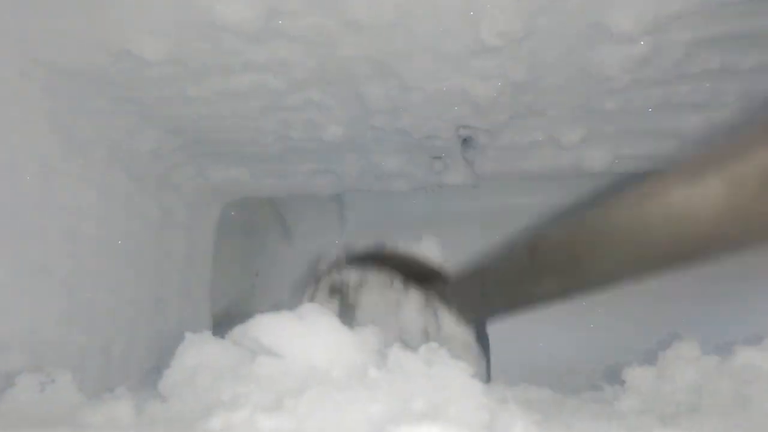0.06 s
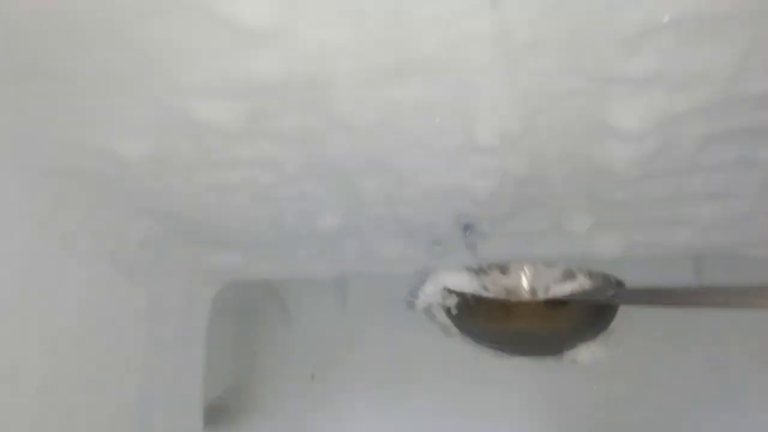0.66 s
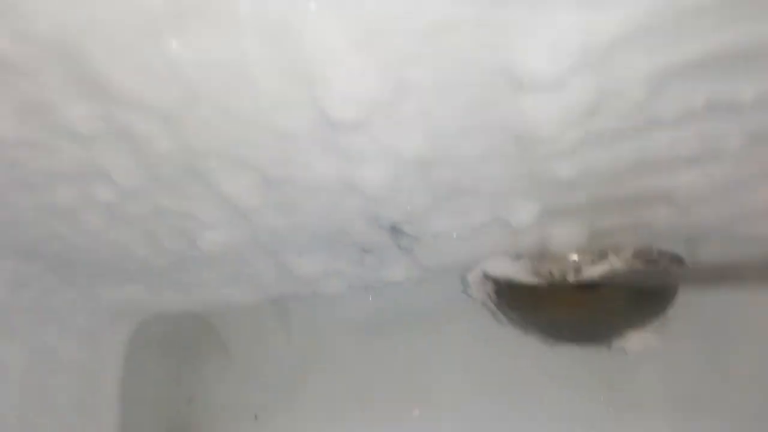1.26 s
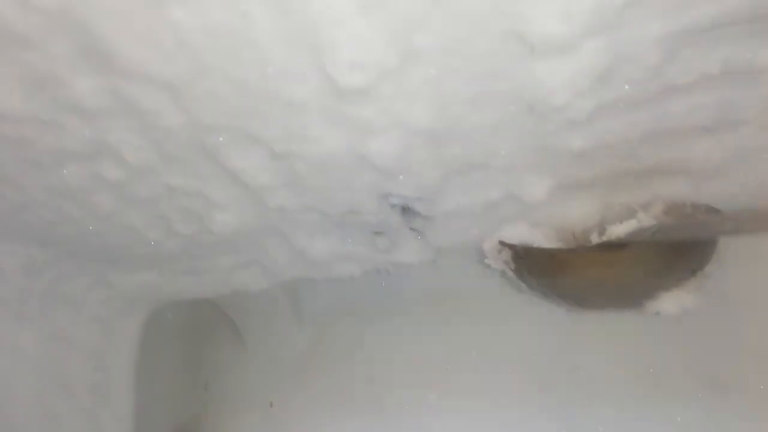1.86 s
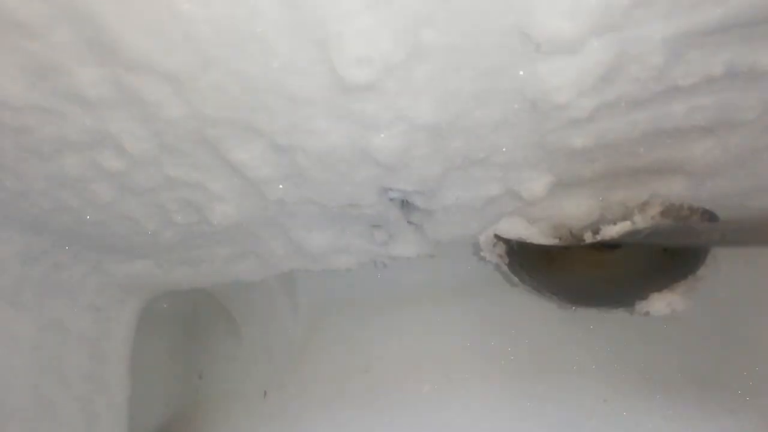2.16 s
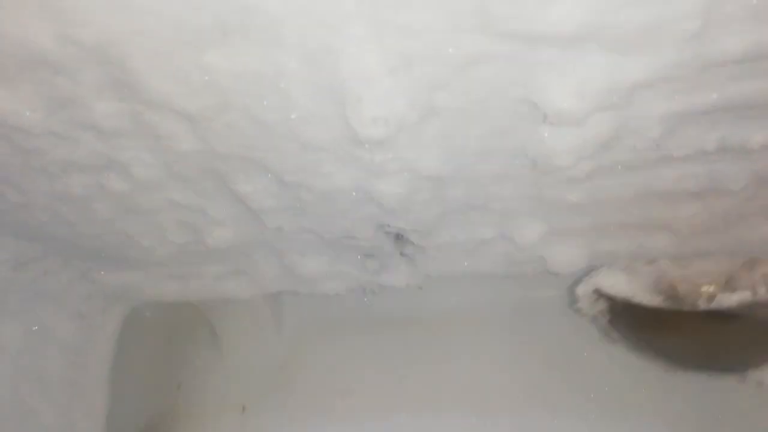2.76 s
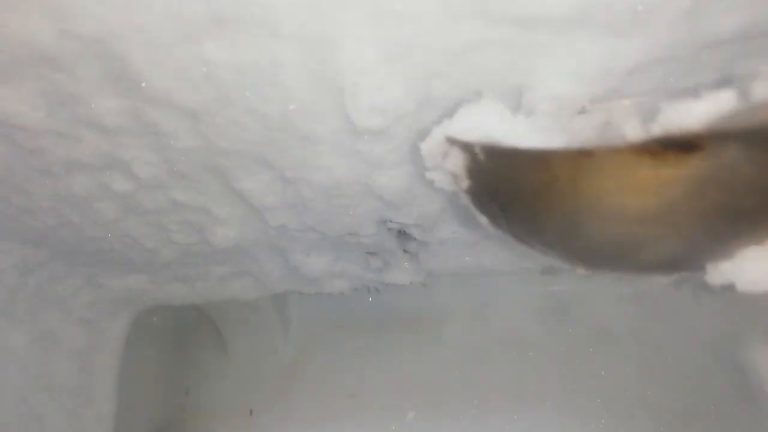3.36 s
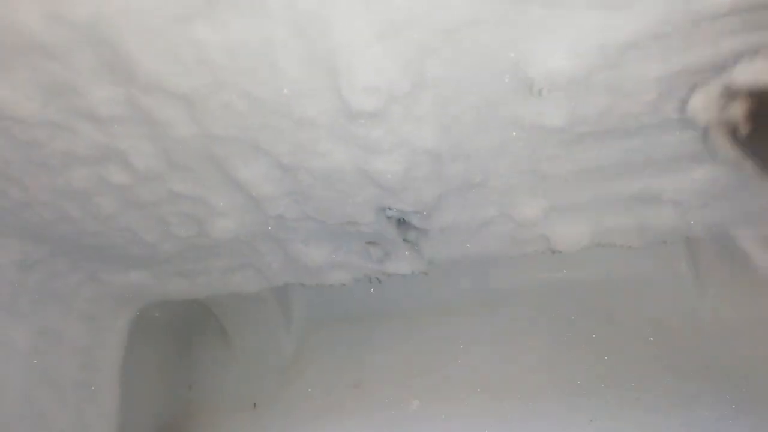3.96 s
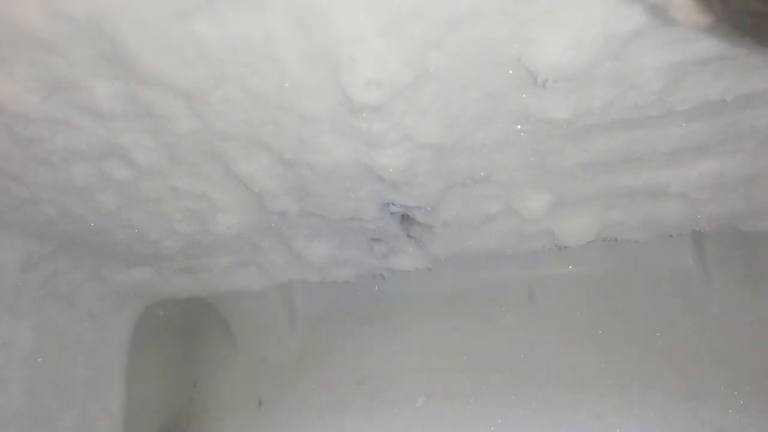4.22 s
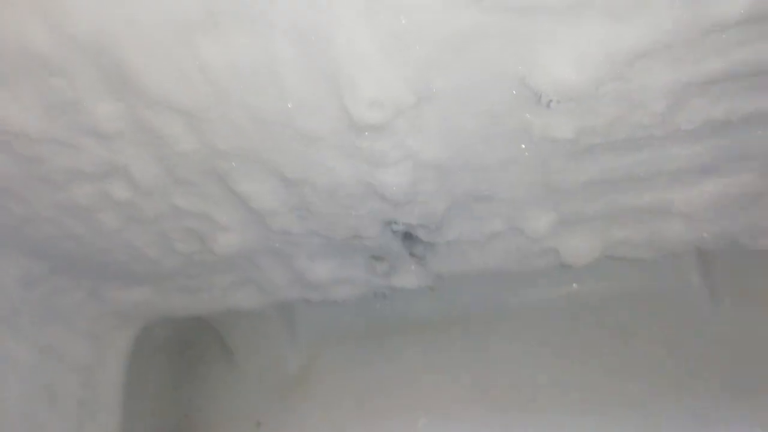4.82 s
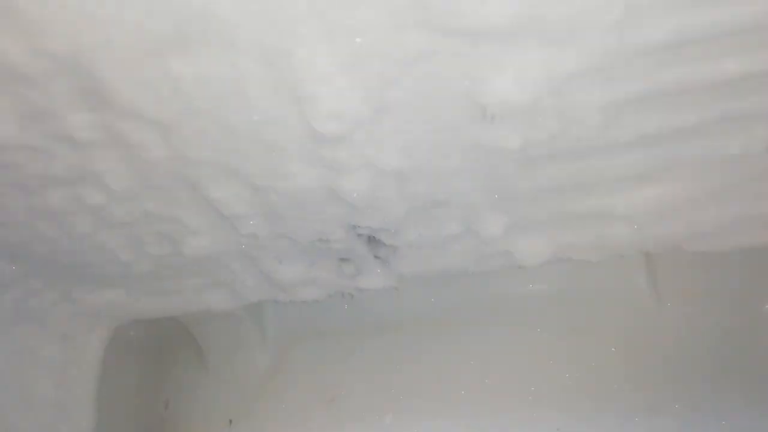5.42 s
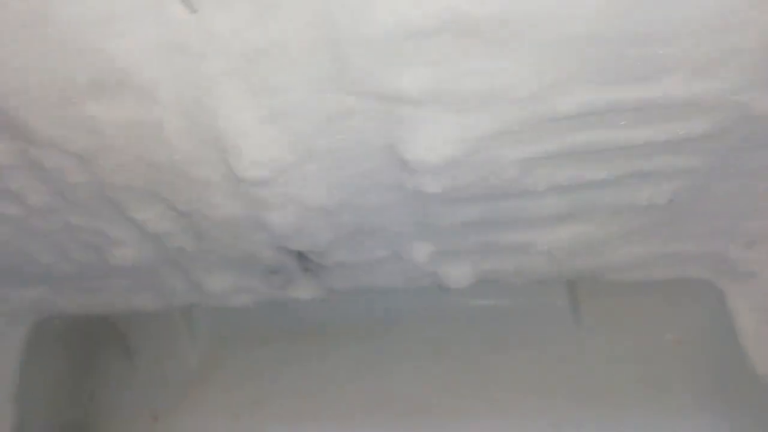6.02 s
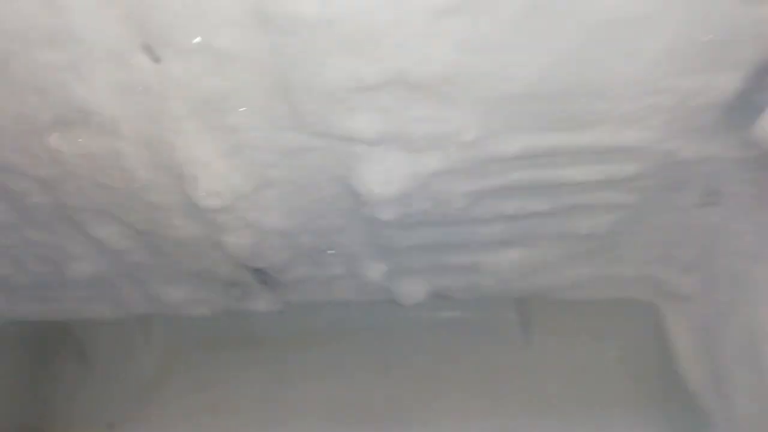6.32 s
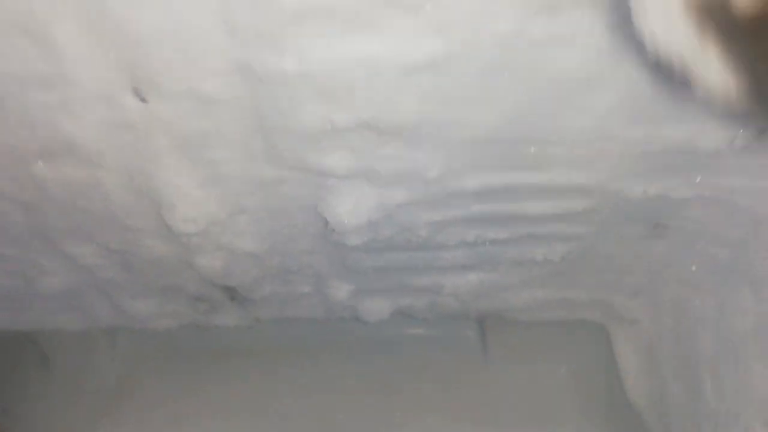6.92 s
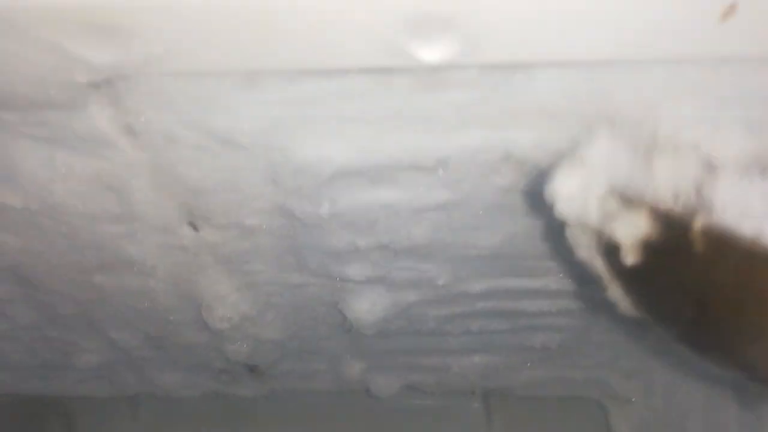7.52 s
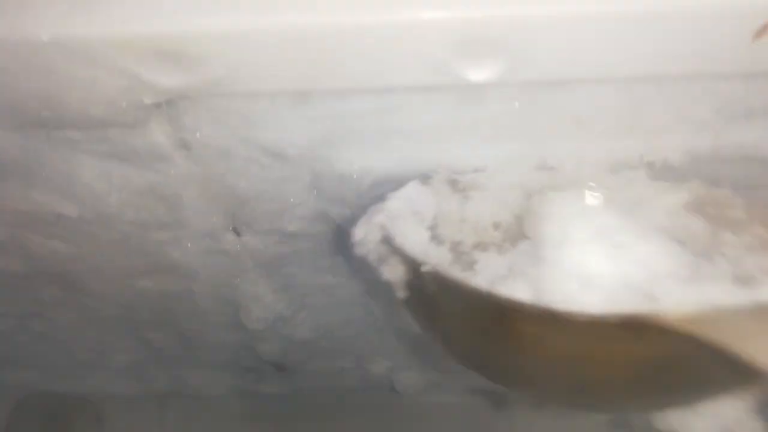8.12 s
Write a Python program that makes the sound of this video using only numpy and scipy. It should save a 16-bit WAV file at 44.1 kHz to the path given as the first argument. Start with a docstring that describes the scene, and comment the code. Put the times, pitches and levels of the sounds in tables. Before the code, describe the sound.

A metal spoon works at thick frost in a freezer, heard close up from the opening. It starts with two hollow, crunchy knocks and a brief scrape, then a crumb of ice clicks sharply against the microphone. A run of crunching strokes follows, the spoon sticking and slipping as ice snaps and the boxy wall thumps. Soft low handling rumbles and a faint hiss lie underneath.

```python
"""Inside a small freezer compartment, heard from a pair of microphones at its mouth, the left
facing the work. A metal spoon scrapes packed frost off the roof, push after push. It knocks the hollow
wall into ringing, then sticks and slips, crushing a stream of ice crystals; now and then a chunk cracks
off. Behind it lie a low noise floor and faint wisps of hiss. The wall's fading ring rumbles at the
start; later a hand shifts on the microphone housing, and a crumb of ice hits it."""
import sys
import numpy as np
from scipy import signal
from scipy.fft import rfft, irfft, next_fast_len
from scipy.io import wavfile

SR = 44100
rng = np.random.default_rng(int(sys.argv[2]) if len(sys.argv) > 2 else 0)


def pcm_store(signal):
    """Save signal as 16-bit PCM."""
    levels = np.round(np.clip(np.atleast_2d(signal), -1, 1) * 32767)
    wavfile.write(sys.argv[1], SR, levels.astype(np.int16).T)


N = 360724
TIME = np.arange(N) / SR


def from_db(db):
    """Decibels to gain."""
    return 10 ** (np.asarray(db) / 20)


def unit_rms(x):
    """Scale to an rms of 1."""
    return x / np.sqrt(np.mean(x ** 2) + 1e-20)


def butter(x, order, hz, kind="low"):
    """Causal Butterworth filter."""
    return signal.sosfilt(signal.butter(order, hz, kind, fs=SR, output="sos"), x)


def drift(per_s):
    """Glide between random values of spread 1."""
    knots = rng.standard_normal(int(N / SR * per_s) + 2)
    return np.interp(TIME * per_s, np.arange(len(knots)), knots)


def swells(rows):
    """Gain of bell-shaped swells."""
    return sum(from_db(db) * np.exp(-((TIME - s) / half_s) ** 2) for s, db, half_s in rows)


def colour(x, spectrum, peaks=(), size=4096):
    """Causal filter of unit power with a smooth spectrum and resonant peaks."""
    hz = np.maximum(np.arange(size // 2 + 1) * SR / size, 1)
    knot_hz, knot_db = np.transpose(spectrum)
    level_db = np.interp(np.log(hz), np.log(knot_hz), knot_db)
    level_db += sum(lift / (1 + (2 * (hz - f) / width) ** 2) for f, width, lift in peaks)
    cepstrum = irfft(np.log(from_db(level_db)))
    cepstrum[1:size // 2] *= 2   # fold to minimum phase
    cepstrum[size // 2 + 1:] = 0
    response = irfft(np.exp(rfft(cepstrum)))
    return signal.oaconvolve(x, response / np.linalg.norm(response))[:N]


def wander(x, depth_db, per_s):
    """Each region of the spectrum grows louder and softer on its own."""
    out, rest = 0, x
    for edge_hz in [500, 900, 1500, 2300, 3500, 5500, 9000]:
        low = signal.sosfiltfilt(signal.butter(2, edge_hz, fs=SR, output="sos"), rest)
        out = out + low * from_db(depth_db * drift(per_s))
        rest = rest - low
    return out + rest


def fractures(per_s, spread_db):
    """Crystals snap at random moments, many small and a few large; rms 1."""
    sizes = from_db(spread_db * np.minimum(rng.exponential(1, N), 5)) * rng.choice([-1, 1], N)
    return unit_rms(sizes * (rng.random(N) < per_s / SR))


def ring(force, hz, t60):
    """One mode: each click sets off a decaying sine."""
    r, w = from_db(-60 / (t60 * SR)), 2 * np.pi * hz / SR
    return signal.lfilter([0, np.sin(w)], [1, -2 * r * np.cos(w), r * r], force + 1e-18)


def strike(times_s, heights, modes):
    """Blows ring the modes, with one height for each blow and mode."""
    out = np.zeros(N)
    for (hz, _, t60), height in zip(modes, heights.T):
        blows = np.zeros(N)
        blows[(times_s * SR).astype(int)] = height
        out += ring(blows, hz, t60)
    return out


def mode_shares(modes, spot_hz, reach_octaves):
    """Each spot of the wall favours the modes near its own pitch; unit power."""
    hz, mode_db, _ = np.transpose(modes)
    share = from_db(mode_db) / (1 + (np.log2(hz / spot_hz[:, None]) / reach_octaves) ** 4)
    return share / np.linalg.norm(share, axis=1, keepdims=True)


# The quiet at the mouth of the box. Each row: frequency in Hz, relative level in dB.
FLOOR_SPECTRUM = [(15, -49), (25, 3.5), (141, -0.5), (734, -24), (796, -20.5), (1440, -25.5), (2160, -21),
                  (2690, -28.5), (4740, -24), (16000, -34.5)]

def noise_floor(level_db=-52.5, sway_db=1.73):
    """A faint floor wavers in patches, alike at both microphones in the bass, duller on the right."""
    common, side = [colour(rng.standard_normal(N), FLOOR_SPECTRUM) for _ in range(2)]
    side = butter(side, 2, 450, "high") * [[1], [-1]]
    gain = from_db(level_db + sway_db * drift(7))
    left, right = gain * (wander(common, depth_db=5, per_s=18) + side)
    return np.array([left, butter(right, 1, 5500)])


# Faint hiss behind the spoon, perhaps from the cooling pipes.
# Each row: start in seconds, centre in Hz, level in dB.
HISS_WISPS = [(.17, 5300, -48), (0.709, 3950, -44), (.71, 7850, -47.5), (0.926, 4960, -46.5),
              (1.015, 4150, -39.5), (1.171, 7100, -50.5), (2.299, 3400, -44.5), (2.466, 2260, -50.5),
              (2.669, 6300, -42), (2.763, 4230, -38.5), (4.391, 4170, -45.5), (4.609, 6400, -50.5),
              (5.535, 6230, -51), (6.256, 2300, -38), (6.96, 5450, -50), (7.06, 4760, -48.5),
              (7.65, 4300, -50.5), (7.809, 2140, -47)]

def wisps(stray_count=24, stray_db=-51, rise_s=.019, band_ratio=1.13):
    """Narrow hiss swells quickly and fades; fainter wisps stray in at random."""
    strays = [(when * (TIME[-1] - .25), 3000 * 4 ** pitch, stray_db)
              for when, pitch in rng.random((stray_count, 2))]
    out = np.zeros(N)
    for s, hz, level_db in list(HISS_WISPS) + strays:
        span = slice(int(s * SR), int(s * SR) + 9000)
        age = np.maximum(TIME[span] - s, 0) / rise_s
        hiss = butter(rng.standard_normal(len(age)), 1, [hz / band_ratio, hz * band_ratio], "band")
        out[span] += from_db(level_db) * unit_rms(hiss) * age * np.exp(1 - age)
    return out


# Low rumbles: the wall's fading ring at the start, then a hand shifting on the housing.
# Each row: middle in seconds, level in dB, half length in seconds.
LOW_RUMBLES = [(0.0, -33, 0.062), (0.377, -32, 0.13), (1.657, -45.5, 0.15), (4.0, -46, 0.36),
               (5.22, -39.5, 0.37), (5.55, -35, 0.038), (5.655, -40.5, 0.023), (6.478, -38, 0.0072),
               (6.81, -36.5, 0.23), (7.188, -39, 0.017), (7.59, -39, 0.063)]

def low_rumbles():
    """Deep noise swells and fades, alike at both microphones."""
    spectrum = [(15, -20), (45, -1.5), (90, -3.5), (140, -6.5), (300, -19.5), (1000, -73)]
    return colour(rng.standard_normal(N), spectrum) * swells(LOW_RUMBLES)


# Ice landing on the housing, nearest the right microphone.
# Each row: time in seconds, relative peak in dB, half width in milliseconds.
CRUMB_TAPS = [(2.3759, -18, 0.36), (2.3804, 2.5, 0.098)]

def ice_crumb(left_db=-12, left_lag_s=.0008):
    """Each tap is a sharp pressure pulse on the right, later and blunter on the left."""
    out = np.zeros((2, N))
    for s, peak_db, half_ms in CRUMB_TAPS:
        half_s = half_ms / 1000
        out[0] -= from_db(peak_db + left_db) * np.exp(-.5 * ((TIME - s - left_lag_s) / (2 * half_s)) ** 2)
        out[1] -= from_db(peak_db) * np.exp(-.5 * ((TIME - s) / half_s) ** 2)
    return butter(out + 1e-18, 1, 170, "high")


# The right microphone against the left; the pair straddles the node of the box's sideways mode.
# Each row: frequency in Hz, level in dB, phase lag in radians.
RIGHT_RESPONSE = [(20, -1.5, 0.5), (231, 1.5, 0.29), (306, -5, 0.5), (348.3, -0.5, 4), (877, -3, 4),
                  (1210, 1.5, 5.5), (1270, -1.5, 4.5), (1650, -8.5, 9), (1830, -4, 8.5), (2400, -10.5, 9.5),
                  (4130, -8.5, 16.5), (7120, -13.5, 27.5), (9740, -16, 36.5), (16500, -31, 97)]

def compartment(x, t60=.024, moves_per_s=16, spots=6):
    """Rough icy walls scatter the treble into a short tail; its pattern shifts as the spoon travels."""
    age = TIME[:6000]
    tails = rng.standard_normal((spots, 2, len(age))) * from_db(-60 * age / t60) * (age > .001)
    tails /= np.linalg.norm(tails, axis=2, keepdims=True)
    tails = butter(tails, 2, 1100, "high")
    weights = np.array([drift(moves_per_s) for _ in range(spots)])
    weights /= np.linalg.norm(weights, axis=0)
    scattered = sum(signal.oaconvolve((x * weight)[None], tail, axes=1)[:, :N]
                    for weight, tail in zip(weights, tails))
    direct = colour(x, [(20, -16), (800, 8), (2500, -4), (16000, -4)])
    left, right = from_db(-3.5) * direct + from_db(-3) * scattered
    size = next_fast_len(N + 16384)
    bins_hz = np.arange(size // 2 + 1) * SR / size
    hz, level_db, lag = np.transpose(RIGHT_RESPONSE)
    shade = from_db(np.interp(bins_hz, hz, level_db)) * np.exp(-1j * np.interp(bins_hz, hz, lag))
    return np.array([left, irfft(rfft(right, size) * shade, size)[:N]])


# Resonances of the box and the frost-laden spoon, heard from the mouth.
# Each row: centre in Hz, width in Hz, lift in dB.
RESONANCES = [(361.6, 67, 10.5), (512, 29, 15.5), (612, 73, 13.5), (806, 13, 10), (875, 60, 2),
              (1070, 82, 5), (1260, 57, 0.5), (1336, 49, 10.5), (1626, 41, 11), (1710, 110, 6.5),
              (2154, 810, 8), (2270, 310, 0), (2784, 220, 4.5), (3710, 40, 2), (5400, 720, 8),
              (6000, 71, 0.5), (7990, 200, -4), (10540, 550, 8), (12800, 180, 7.5)]
# Light rubs inside the box. Each row: middle in seconds, relative level in dB, half length in seconds.
SPOON_RUBS = [(1.655, -45.5, 0.094), (2.02, -50.5, 0.15), (2.29, -42.5, 0.08), (2.392, -35.5, 0.0076)]

def resting_spoon():
    """Between the first strokes the spoon trembles against the frost."""
    spectrum = [(200, -8), (1200, 2), (4500, 6.5), (9000, -6), (16000, -7)]
    rub = colour(fractures(per_s=6400, spread_db=5.5), spectrum, RESONANCES)
    return rub * swells(SPOON_RUBS) * from_db(3.7 * drift(30.67))


# The frosted wall, just beyond the microphones. Each row: mode in Hz, weight in dB, t60 in seconds.
WALL_MODES = [(99.7, -1, 0.9), (133, 12, 0.14), (150.1, -0.5, 0.35), (161.5, -20, 0.14),
              (196.6, -0.5, 0.23), (227.2, -2.5, 0.17), (260.8, 5.5, 0.14), (288, -22.5, 0.26),
              (378, -8, 0.074)]
# The spoon crushes a crust and, at the height of the crunch, meets the wall.
# Each row: time in seconds, thump in dB, pitch of that spot in Hz, clack in dB, crunch in dB,
# crunch treble in dB, crushing time in seconds. Levels are relative.
WALL_KNOCKS = [(.078, -4, 157, -10, -23, -34.5, .0012), (0.272, -2, 140, -9.5, -20.5, -39.5, 0.0019),
               (.37, -23, 92.5, -30, -62, -67, 0.0031), (.398, -17.5, 191, -43, -70, -65, 0.0063),
               (1.056, -20, 323, -26, -19, -43, 0.0073), (1.296, -22.5, 320, -52, -31.5, -45, 0.017),
               (1.443, -22.5, 280, -35, -31, -49, 0.024), (2.623, -23, 251, -44, -25.5, -41, 0.01),
               (2.902, -10, 294, -27, -13.5, -41, 0.0016), (3.214, -8, 277, -28, -22, -34, 0.0025),
               (3.857, -15, 273, -36, -46, -54, 0.0055), (3.911, -17.5, 262, -39, -21.5, -48, 0.015),
               (3.955, -19.5, 210, -41, -32, -21.5, 0.00078), (4.025, -13.5, 238, -26, -14, -30, 0.0021),
               (4.116, -10.5, 225, -6.5, -16, -31, 0.0012), (4.191, -13.5, 210, -17.5, -29, -33, 0.002),
               (4.688, -24.5, 173, -48, -27.5, -41.5, 0.0031), (4.744, -24, 244, -22, -37, -67, 0.018),
               (4.913, -15, 165, -16, -24, -22, 0.0028), (5.108, -13, 228, -25, -21.5, -26, 0.0012),
               (5.226, -12, 172, -14.5, -20.5, -37, 0.0034), (5.759, -12, 178, -26.5, -24, -40, 0.0026),
               (5.982, -16, 180, -32, -17, -28.5, 0.002), (6.05, -15.5, 132, -32, -24, -47, 0.018),
               (6.562, -9.5, 132, -27.5, -26.5, -34.5, 0.0029), (6.682, -22, 98, -52, -49, -57, 0.0034),
               (7.248, -12, 155, -17.5, -22.5, -45, 0.0034), (7.894, -7, 175, -33, -19, -35.5, 0.0026)]

def wall_thumps(contact_s=.0016):
    """Each knock rings the low modes that are lively at the struck spot."""
    times_s, thump_db, spot_hz, *_ = np.transpose(WALL_KNOCKS)
    heights = from_db(thump_db)[:, None] * mode_shares(WALL_MODES, spot_hz, reach_octaves=.59)
    cushion = np.hanning(int(contact_s * SR) + 3)   # frost softens the contact
    thumps = np.convolve(strike(times_s, heights, WALL_MODES), cushion / cushion.sum())[:N]
    return from_db(.5) * butter(thumps, 2, 95, "high")


# Higher modes of the same wall. Each row: frequency in Hz, weight in dB, t60 in seconds.
CLACK_MODES = [(357, -22.5, 0.197), (548, -17.5, 0.079), (756, 2, 0.017), (845, 3, 0.03), (990, 2, 0.039),
               (1200, 9, 0.025), (1204, 12, 0.018), (1407, 16.5, 0.012)]

def wall_clacks(pitch_ratio=3.1, linger_t60=.17):
    """Hard knocks reach the higher modes: a hollow clack that lingers in the box."""
    times_s, _, spot_hz, clack_db, *_ = np.transpose(WALL_KNOCKS)
    heights = from_db(clack_db[:, None] + rng.normal(0, 3.9, (len(times_s), len(CLACK_MODES))))
    heights *= mode_shares(CLACK_MODES, pitch_ratio * spot_hz, reach_octaves=.43)
    lingering = strike(times_s, heights, [(hz, db, linger_t60) for hz, db, _ in CLACK_MODES])
    return from_db(-5.5) * strike(times_s, heights, CLACK_MODES) + from_db(-23) * lingering


def wall_shudder():
    """The dragging spoon keeps the wall trembling on its way from one knocked spot to the next."""
    times_s, _, spot_hz, *_ = np.transpose(WALL_KNOCKS)
    drag = fractures(per_s=500, spread_db=3) * push_gain("tremble")
    shares = mode_shares(WALL_MODES, spot_hz, reach_octaves=.87).T
    trembling = sum((-1) ** k * ring(drag * np.interp(TIME, times_s, shares[k]), hz, t60)
                    for k, (hz, _, t60) in enumerate(WALL_MODES))
    return np.std(drag) * unit_rms(trembling)


# Coarse grains and fine crystals, crushed close by. Each row: frequency in Hz, relative level in dB.
GRAIN_SPECTRUM = [(100, 7.5), (300, 2.5), (500, -6), (900, -.5), (1500, -1), (2700, 2), (4000, -1),
                  (8000, -12), (16000, -101)]
CRYSTAL_SPECTRUM = [(300, 15.5), (2000, -12.5), (3700, 25), (5000, 18.5), (8000, 12.5), (13000, 13.5),
                    (14300, 9), (16000, 7)]
# Chunks leaving the roof without a knock. Each row: peak time in seconds, relative crunch and
# treble levels in dB, crushing time in seconds.
CHUNK_CRACKS = [(1.681, -33.5, -76, 0.0029), (2.235, -23, -53, 0.0017), (3.738, -28.5, -38.5, 0.0059),
                (3.787, -29, -51, 0.011), (3.811, -44, -30, 0.0024), (4.177, -22, -37.5, 0.0081),
                (4.829, -36, -57, 0.0044), (4.894, -14.5, -31, 0.0021), (5.179, -18, -28.5, 0.0046),
                (6.294, -29, -42, 0.0051), (6.358, -26.5, -41, 0.0025), (6.701, -24, -35.5, 0.0061),
                (6.867, -22, -33, 0.0044), (7.549, -21, -41, 0.0053), (7.586, -25.5, -34.5, 0.0038)]

def cracking():
    """A chunk breaks in a short avalanche of fractures that swells and dies."""
    crunch_gain, treble_gain = np.zeros(N), np.zeros(N)
    for peak_s, crunch_db, treble_db, crush_s in frost_breaks():
        start_s = peak_s - crush_s
        span = slice(int(start_s * SR), int((start_s + .12) * SR))
        age = np.maximum(TIME[span] - start_s, 0) / max(crush_s, .001)
        burst = (age * np.exp(1 - age)) ** 1.9
        crunch_gain[span] += from_db(crunch_db) * burst
        treble_gain[span] += from_db(treble_db) * burst
    snaps = fractures(per_s=12000, spread_db=1.9)
    crunch = spoon_bowl(colour(snaps * crunch_gain, GRAIN_SPECTRUM, RESONANCES))
    treble = colour(snaps * treble_gain, CRYSTAL_SPECTRUM, RESONANCES)
    return from_db(.5) * crunch + from_db(9) * treble


def frost_breaks():
    """Every moment at which frost gives way, with or without a knock, as rows like CHUNK_CRACKS."""
    return [(s, *crunch) for s, _, _, _, *crunch in WALL_KNOCKS] + list(CHUNK_CRACKS)


# The spoon's pushes along the roof, facing the left microphone.
# Each row: start, length, dig-in time and lift-out time in seconds, then grind, hiss, swell along
# the push, wall tremble and bowl ring in relative dB.
PUSHES = [(1.269, .26, 0.0037, 0.07, -39, -42, 20.5, -39.5, -1),
          (2.893, 0.43, 0.0085, 0.059, -34.5, -39, 4, -31.5, 3),
          (3.752, 0.56, 0.078, 0.051, -31, -33, -7.5, -31.5, 2.5),
          (4.804, 0.3, 0.037, 0.02, -30.5, -33, -10.5, -28, 1),
          (5.099, 0.4, 0.0057, 0.087, -32.5, -37, -8.5, -33, -8.5),
          (5.763, 0.27, 0.016, 0.037, -33, -38, 11.5, -36, -3),
          (6.025, 0.19, 0.023, 0.035, -34, -33.5, -8, -35.5, -1),
          (6.275, 0.099, .012, 0.038, -33, -36, 4, -34, 0),
          (6.566, 0.37, 0.073, .075, -35.5, -39.5, 12, -33, -8.5),
          (7.252, 0.29, 0.054, 0.045, -33.5, -38, 11.5, -41, -6),
          (7.526, 0.11, 0.018, 0.051, -35.5, -41.5, -1, -30.5, -9),
          (7.91, 0.59, 0.083, .05, -31, -39.5, -3, -35, -4.5)]

def push_gain(layer, stall_s=.011, stall_lead_s=.0043):
    """Each push digs in, swells or eases, and lifts out; the rim sticks just before frost breaks."""
    bite_db, stall_db = (21, 7) if layer == "hiss" else (19.5, 3)
    gain, stuck = np.zeros(N), np.zeros(N)
    for s, length, dig_s, lift_s, grind_db, hiss_db, swell_db, tremble_db, _ in PUSHES:
        level_db = {"grind": grind_db, "hiss": hiss_db, "tremble": tremble_db}[layer]
        span = slice(int(s * SR), int((s + 2 * length) * SR))
        age = TIME[span] - s
        entering = np.maximum(1 - age / dig_s, 0)
        leaving = np.maximum(1 + (age - length) / lift_s, 0)
        along = np.minimum(age / length, 1) - .5
        gain[span] += from_db(level_db + swell_db * along - bite_db * (entering + leaving))
    for s, _, _, crush_s in frost_breaks():
        span = slice(max(int((s - .1) * SR), 0), int((s + .1) * SR))
        stuck[span] += np.exp(-((TIME[span] - s + crush_s + stall_lead_s) / stall_s) ** 2)
    return gain * from_db(-stall_db * stuck)


def spoon_bowl(x, band_hz=(1020, 1420)):
    """The bowl's broad resonance stands out or sinks with the grip of each push."""
    start_s, length, *_, ring_db = np.transpose(PUSHES)
    gain = from_db(np.interp(TIME, start_s + length / 2, ring_db))
    return x + butter(x, 1, band_hz, "band") * (gain - 1)


def loaded_spoon(x, spectrum, loads, spoon_above_hz=1450, detune=.088):
    """The spoon's resonances move with a heavy, middling or light load of frost; the box's stay put."""
    out = 0
    for step, share in zip((-1, 0, 1), loads):
        peaks = [(hz * (1 + step * detune * (hz > spoon_above_hz)), width, db)
                 for hz, width, db in RESONANCES]
        out = out + colour(x * share, spectrum, peaks)
    return out


def scraping(slip_db=2, slips_per_s=200, load_changes_per_s=6):
    """The rim sticks and slips through the frost; each slip crushes coarse grains and fine crystals."""
    slips = unit_rms(from_db(slip_db * drift(slips_per_s)))
    grains = fractures(per_s=6000, spread_db=2.5)
    crystals = unit_rms(.5 * grains + fractures(per_s=8000, spread_db=6))
    loads = np.exp(2 * np.array([drift(load_changes_per_s) for _ in range(3)]))
    loads /= loads.sum(axis=0)
    grind = spoon_bowl(loaded_spoon(grains * slips * push_gain("grind"), GRAIN_SPECTRUM, loads))
    hiss = loaded_spoon(crystals * slips * push_gain("hiss"), CRYSTAL_SPECTRUM, loads)
    scrape = from_db(3.5) * grind + from_db(5) * hiss
    return wander(scrape, depth_db=2.5, per_s=14)   # the point of contact moves


def scene():
    """The work inside the box, heard from its mouth, with the crumb, the floor and the rumbles."""
    inside = scraping() + cracking() + wall_thumps() + wall_clacks() + wall_shudder()
    inside += resting_spoon() + wisps()
    return compartment(inside) + ice_crumb() + noise_floor() + low_rumbles()


def record(dry):
    """Peaks stop at full scale, and the top is cut steeply at 15850 Hz."""
    lowpass = signal.ellip(10, .1, 90, 15850, fs=SR, output="sos")
    return signal.sosfilt(lowpass, np.clip(dry, -1, 1))


dry = scene()
out = record(dry)
pcm_store(out)
```